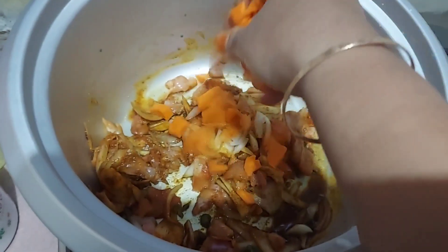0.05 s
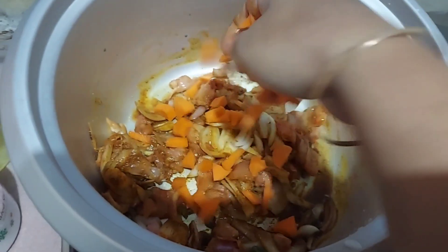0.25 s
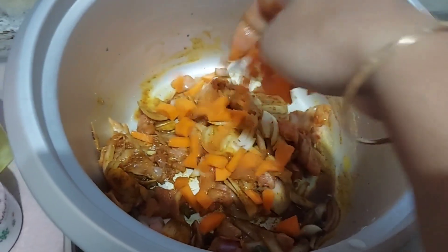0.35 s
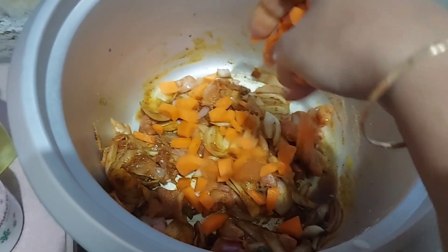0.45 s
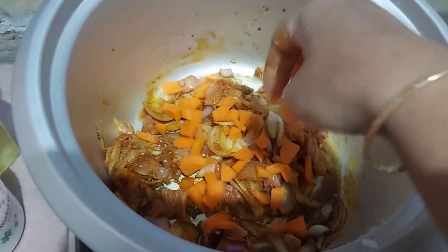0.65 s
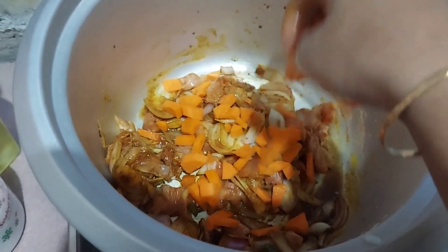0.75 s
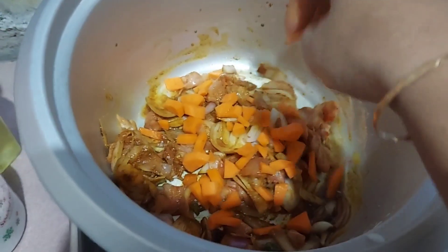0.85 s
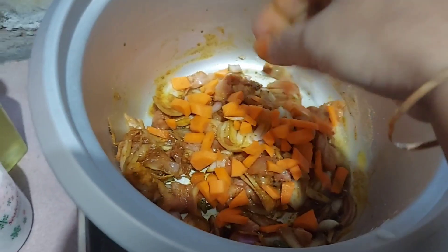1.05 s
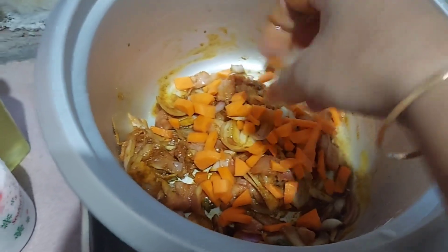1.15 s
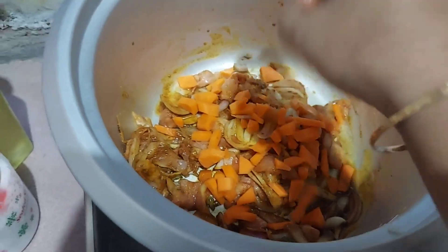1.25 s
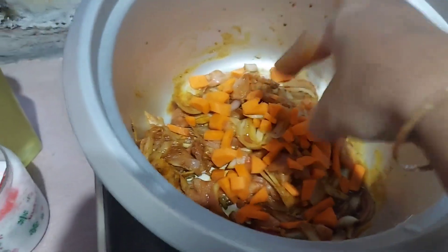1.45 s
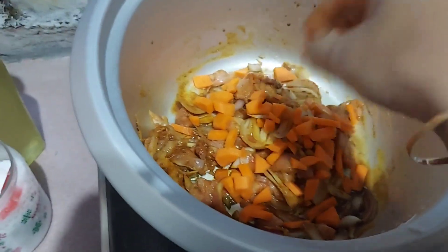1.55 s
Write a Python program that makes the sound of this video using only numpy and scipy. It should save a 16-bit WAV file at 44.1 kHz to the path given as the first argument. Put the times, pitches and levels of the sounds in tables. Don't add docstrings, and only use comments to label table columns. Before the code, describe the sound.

Chopped carrot pieces drop in soft hollow thuds into a deep metal pot, then a bangle clinks

```python
import sys
import numpy as np
from scipy import signal
from scipy.fft import rfft, irfft, next_fast_len
from scipy.io import wavfile

SR = 44100
rng = np.random.default_rng(int(sys.argv[2]) if len(sys.argv) > 2 else 0)


def wav_record(signal):
    frames = np.transpose(np.atleast_2d(signal))
    bounded = np.clip(frames, -1, 1)
    quanta = np.round(bounded * 32767).astype(np.int16)
    wavfile.write(sys.argv[1], SR, quanta)


def volts_from_decibels(level):
    exponent = np.asarray(level, float) / 20
    return 10 ** exponent


N = 70560
TIME_S = np.arange(N) / SR
OPPOSITE = np.array([[.5], [-.5]])


def rms_one(x):
    return x / np.sqrt(np.mean(x ** 2) + 1e-20)


def at_hz(points, hz):
    table_hz, values = np.transpose(points)
    return np.interp(np.log(hz), np.log(table_hz), values)


def ring(clicks, hz, t60):
    r, w = volts_from_decibels(-60 / (t60 * SR)), 2 * np.pi * hz / SR
    return signal.lfilter([0, np.sin(w)], [1, -2 * r * np.cos(w), r * r], clicks + 1e-18)


def resonance(x, hz, width_hz):
    r = np.exp(-np.pi * width_hz / SR)
    return signal.lfilter([1, 0, -1], [1, -2 * r * np.cos(2 * np.pi * hz / SR), r * r], x)


def steep_resonance(x, hz, width_hz):
    return resonance(resonance(x, hz, width_hz), hz, width_hz)


def high_pass(x, hz):
    return signal.sosfilt(signal.butter(4, hz, "high", fs=SR, output="sos"), x)


def coloured(x, spectrum):
    hz = np.fft.rfftfreq(N, 1 / SR) + 1
    return irfft(rfft(x) * volts_from_decibels(at_hz(spectrum, hz)), N)


def burst(s, ms):
    u = np.maximum(TIME_S - s, 0) * 1000 / ms
    return 2 * (1 - np.exp(-6 * u)) * np.exp(-np.minimum(u, 50))


# (frequency [Hz], width [Hz], level [dB])
FAN_TONES = [
    (84.6, 5.2, -78.5),
    (159.2, 21, -63.5),
    (325.5, 3.7, -70),
]
# (frequency [Hz], level [dB])
AIR_COLOUR = [(20, -11), (45, -9), (100, 1), (200, -4), (416, -15), (1040, -34.5), (2840, -31),
              (16000, -42.5)]
# (frequency [Hz], likeness [0 to 1])
AIR_LIKENESS = [(30, 0.1), (80, 0.98), (200, 0.8), (700, 0.93), (2500, 0.15), (12000, 0.032)]
AIR_DB = -60


def kitchen_air():
    hum = 0
    for hz, width_hz, db in FAN_TONES:
        narrow = steep_resonance(rng.standard_normal(N + SR), hz, width_hz)[SR:]
        hum = hum + volts_from_decibels(db) * rms_one(narrow)
    alike = np.clip(at_hz(AIR_LIKENESS, np.fft.rfftfreq(N, 1 / SR) + 1), 0, 1)
    mid, side = rfft(coloured(rng.standard_normal((2, N)), AIR_COLOUR))
    air = irfft(np.sqrt(1 + alike) * mid + np.sqrt(1 - alike) * side * np.array([[1], [-1]]), N)
    return hum + volts_from_decibels(AIR_DB) * rms_one(air)


FAN_TONE_HZ, FAN_TONE_DB = 160.5, -56


def blade_tone():
    return volts_from_decibels(FAN_TONE_DB) * np.sqrt(2) * np.sin(2 * np.pi * FAN_TONE_HZ * TIME_S)


# (time [s], level [dB])
RUSTLE_LEVEL = [(0, -75.5), (.12, -83.5), (0.221, -69.5), (.35, -70.5), (.5, -72.5), (.64, -70.5),
                (0.699, -83), (0.949, -91), (0.997, -70.5), (1.098, -99.5), (1.3, -104), (1.5, -83.5)]
# (frequency [Hz], level [dB per Hz])
GRAIN_COLOUR = [(250, -32), (480, -3.5), (1040, -12.5), (1500, -26), (3000, -26), (6000, -31), (10000, -36),
                (15000, -32)]
GRAINS_PER_S, RUSTLE_DB, GRAIN_SPREAD_DB = 6100, 3.5, 3.8


def rustle():
    size_db = GRAIN_SPREAD_DB * np.minimum(rng.exponential(1, (2, N)), 5)
    sizes = volts_from_decibels(size_db) * rng.choice([-1, 1], (2, N))
    grains = sizes * (rng.random((2, N)) < GRAINS_PER_S / SR)
    sound = coloured(grains, GRAIN_COLOUR)
    treble = high_pass(sound, 2000)
    s, db = np.transpose(RUSTLE_LEVEL)
    return volts_from_decibels(np.interp(TIME_S, s, db) + RUSTLE_DB) * sound / np.std(treble)


# (time [s], peak level [dB], brightness [dB per octave], reach into the wall [dB])
LANDINGS = [(.002, -70.5, 24, -2), (0.0401, -32, -9, -2), (.059, -37.5, -1.5, 2), (.069, -35.5, -6, -14),
            (.108, -49.5, -2, -6), (.168, -51.5, -1, 0), (0.195, -43, -15, -13), (.229, -12.5, 2, 1.5),
            (.245, -36, 0.5, 1), (.253, -35.5, -1.5, 4), (.263, -32.5, 0.5, 0), (.277, -31.5, 1, -7.5),
            (.289, -37, 0, 16), (.312, -44, -2.5, 0), (.327, -43.5, 4.5, 5), (.35, -38.5, -2, -5.5),
            (.388, -34.5, 0.5, 1.5), (0.417, -42.5, -1.5, 3), (.445, -35.5, -8, 4), (0.48, -42.5, -3.5, -2),
            (0.508, -38, 2.5, 2.5), (0.529, -63, -2, 1), (.546, -42.5, 8.5, 1), (0.589, -41.5, -15, -2),
            (.631, -36.5, -2, -10), (.672, -55.5, -3, 7), (.763, -29.5, 3.5, -4), (.779, -28, 4, -8.5),
            (.796, -48, -1, -9), (0.855, -47.5, 4, 0.5), (0.943, -47, -8, -7), (.973, -39.5, -2, -4),
            (.99, -40.5, -1, -6), (1.049, -51.5, -1, -7.5), (1.077, -57, 11.5, -5), (1.149, -23.5, -3, 0),
            (1.157, -33, -10, -14), (1.166, -30.5, 1, -3), (1.176, -33.5, -5, -1), (1.184, -37.5, 3, -8),
            (1.197, -55, -8, 6), (1.219, -55, -14, 0), (1.262, -27.5, 0.5, 0.5), (1.282, -40, 3, -3.5),
            (1.296, -42.5, -1.5, 0), (1.335, -33.5, 0, -1), (1.409, -44.5, 0, 7)]
# (level [dB], t60 [s])
POT_MODES = [(-11, 0.038), (0, 0.072), (0.5, 0.069), (-8.5, 0.2), (-8, 0.19), (-7.5, 0.052), (-6.5, 0.014),
             (-11.5, 0.04), (-1, 0.056), (-6, 0.037), (-9.5, 0.01), (-27, 0.066), (-19, 0.04),
             (-22.5, 0.035)]
POT_PITCHES = [325, 408, 452, 486, 548, 686, 740, 815, 1037, 1095, 1180, 1390, 1525, 1720]
THUD_DB, POT_LOW_HZ, WALL_FROM_HZ, WALL_REACH_HZ = -9, 334.5, 720, 950
CONTACT_MS, LONGEST_CONTACT_MS, SOFTER_PER_DB = 0.7, 1.23, 0.3057
FIRST_TOUCH_DB, FULL_WEIGHT_MS = -13.5, 1.356
SETTLE_DB, SETTLE_MS, SETTLE_PER_S = -21, 40.9, 900
DETUNE, STRENGTH_SPREAD_DB, MODE_PAN_DB = .008, 2.0, 5


def landing_push(tilt, ms):
    contact_ms = min(CONTACT_MS * np.exp(-SOFTER_PER_DB * tilt), LONGEST_CONTACT_MS)
    pulse = 0
    for late_ms, db in [(0, FIRST_TOUCH_DB), (FULL_WEIGHT_MS, 0)]:
        press = np.sin(np.pi * np.clip((ms - late_ms) / contact_ms, 0, 1)) ** 2
        pulse = pulse + volts_from_decibels(db) * press / (contact_ms * SR / 2000)
    touches = rng.standard_normal(len(ms)) * np.exp(-ms / SETTLE_MS)
    touches *= rng.random(len(ms)) < SETTLE_PER_S / SR
    return pulse + volts_from_decibels(SETTLE_DB) * np.convolve(touches, pulse[:200])[:len(ms)]


def thuds():
    ms = np.arange(9000) * 1000 / SR
    out = np.zeros((2, N + len(ms)))
    for s, peak_db, tilt, wall_db in LANDINGS:
        push = landing_push(tilt, ms)
        start = int(s * SR)
        for hz, (mode_db, t60) in zip(POT_PITCHES, POT_MODES):
            strength, pitch, pan = rng.standard_normal(3)
            db = peak_db + mode_db + THUD_DB + tilt * np.log2(hz / 500)
            db += wall_db * (hz > WALL_REACH_HZ) + STRENGTH_SPREAD_DB * strength
            sound = np.sign(hz - WALL_FROM_HZ) * volts_from_decibels(db) * ring(push, hz * (1 + DETUNE * pitch), t60)
            out[:, start:start + len(ms)] += volts_from_decibels(MODE_PAN_DB * pan * OPPOSITE) * sound
    return high_pass(out[:, :N], POT_LOW_HZ)


# (time [s], level at 2.9 kHz [dB], level at 6.4 kHz [dB], level at 14.6 kHz [dB])
TICKS = [(0.042, -49.5, -57, -69), (0.0676, -58, -68, -58.5), (0.169, -53, -63, -62),
         (0.2004, -51.5, -70, -63), (0.2174, -62, -86, -79), (0.2294, -35, -49.5, -60),
         (0.2456, -68, -66, -53), (0.2859, -50, -64, -52), (0.3163, -56, -61.5, -61),
         (0.3645, -81, -78, -55), (0.3877, -47.5, -58.5, -52), (0.418, -70, -67, -75),
         (0.4565, -60, -69, -57), (0.4754, -79, -81, -62), (0.503, -58, -57.5, -44.5),
         (0.5313, -37.5, -63, -60), (0.558, -59, -63, -66), (0.582, -57, -64, -59),
         (0.633, -55, -77, -69), (0.7629, -44.5, -73, -86), (0.7947, -51, -70, -83),
         (0.851, -51.5, -74, -69), (0.9236, -60, -88, -83), (0.945, -54.5, -83, -86),
         (0.9724, -46.5, -59, -75), (0.9824, -65, -59.5, -48.5), (1.0273, -79, -85, -61.5),
         (1.076, -50.5, -65.5, -74), (1.0953, -83.5, -72, -58), (1.1224, -56, -88, -68),
         (1.1516, -41.5, -54.5, -54),
    (1.173, -58, -87.5, -63.5),
    (1.1888, -68, -68, -65),
    (1.2194, -85, -83, -61.5),
    (1.264, -43, -57.5, -83),
    (1.2814, -54.5, -72, -69),
    (1.337, -52.5, -67, -99),
    (1.3475, -43.5, -71.5, -91),
    (1.4696, -62.5, -67, -63),
]
# (frequency [Hz], width [Hz], burst [ms], level [dB])
TICK_RESONANCES = [
    (2910, 2500, 2.07, -9.5),
    (6430, 2970, 1.57, 2),
    (14600, 6300, 1.34, -3.5),
]
TICK_OWN, JUICE_DB, JUICE_MS = 1, -16, 17


def ticks():
    out = 0
    for band, (hz, width_hz, ms, db) in enumerate(TICK_RESONANCES):
        envelope = 0
        for tick in TICKS:
            shape = burst(tick[0], ms) + volts_from_decibels(JUICE_DB) * burst(tick[0], JUICE_MS)
            envelope = envelope + volts_from_decibels(tick[band + 1]) * shape
        noise = rng.standard_normal(N) + TICK_OWN * rng.standard_normal((2, N))
        bursts = steep_resonance(envelope * noise, hz, width_hz)
        steady = steep_resonance(noise, hz, width_hz)
        out = out + volts_from_decibels(db) * bursts / np.std(steady)
    return out


# (time [s], peak level [dB], frequency [Hz],
# t60 [s])
SHORT_KNOCKS = [(0.043, -61, 1670, 0.042), (0.0429, -35.5, 433.5, 0.091), (0.168, -51, 1010, 0.043),
                (1.151, -29.5, 407, 0.096), (0.765, -40, 450, .07), (0.2162, -50, 2920, 0.028),
                (0.418, -54.5, 2940, .03), (.509, -61, 2070, 0.24), (.2295, -39, 2236, .04),
                (0.531, -42.5, 1780, 0.016), (.9248, -53, 2920, .02), (.945, -47, 3076, 0.017),
                (.974, -46, 3575, 0.027), (1.076, -55, 1930, 0.034), (1.126, -52.5, 2750, 0.039),
                (1.152, -50.5, 2150, 0.038), (1.153, -53.5, 1613, 0.051), (1.264, -56.5, 2160, 0.092),
                (1.347, -45, 2790, 0.02), (1.538, -40.5, 3720, 0.013)]


def knocks():
    out = np.zeros(N)
    for s, db, hz, t60 in SHORT_KNOCKS:
        click = np.zeros(N)
        click[int(s * SR)] = volts_from_decibels(db)
        out += ring(click, hz, t60) - 0.42 * ring(click, hz, 1.05 * t60)
    return out


BUMP_S, BUMP_DB, BUMP_HZ, BUMP_WIDTH_HZ, BUMP_MS = 0.915, -62, 52, 49, 60


def bump():
    noise = steep_resonance(rng.standard_normal((2, N)), BUMP_HZ, BUMP_WIDTH_HZ)
    return volts_from_decibels(BUMP_DB) * burst(BUMP_S, BUMP_MS) * rms_one(noise)


# (level [dB], t60 [s])
BANGLE_MODES = [(6.5, 0.13), (-3, 0.12), (5.5, 0.067), (-2, 0.097), (11.5, 0.023), (-18.5, 0.13),
                (0.5, 0.22), (-8, .12), (-2, .04), (-1, .04), (11, 0.027), (-6, 0.13), (-8, 0.16),
                (-20, 0.14)]
BANGLE_PITCHES = [4745, 4880, 5012, 5227, 5480, 6363, 6602, 6856, 7010, 7260, 7600, 8193, 8796, 9749]
BANGLE_S, BANGLE_DB, BANGLE_PAN_DB, BLOOM_S = 1.5216, -46, 4.5, 0.0002
HAZE_DB, HAZE_T60_S, HAZE_CENTRE_HZ, HAZE_GAP_HZ = -61.5, 0.49, 6870, 6050
UNDER_HAZE_DB = -9
SNAP_DB, SNAP_HZ, SNAP_T60_S = -24, 6890, 0.0084


def bangle():
    click = np.zeros(N)
    click[int(BANGLE_S * SR)] = 1
    out = np.zeros((2, N))
    for k, (hz, (db, t60)) in enumerate(zip(BANGLE_PITCHES, BANGLE_MODES)):
        pan_db = BANGLE_PAN_DB * rng.standard_normal() * OPPOSITE
        out += (-1) ** k * volts_from_decibels(BANGLE_DB + db + pan_db) * ring(click, hz, t60)
    for spot, luck, sign, pan in rng.random((200, 4)):
        hz = 2700 * 5.8 ** spot
        db = HAZE_DB - 14 * luck - 3.8 * abs(np.log2(hz / HAZE_CENTRE_HZ))
        db -= 15 * np.exp(-((hz - HAZE_GAP_HZ) / 300) ** 2)
        db += UNDER_HAZE_DB * (hz < BANGLE_PITCHES[0])
        gain = np.sign(sign - .5) * volts_from_decibels(db + 20 * (pan - 1.0) * OPPOSITE)
        out += gain * ring(click, hz, HAZE_T60_S * 5000 / hz)
    snap = ring(click, SNAP_HZ, SNAP_T60_S) - 0.2 * ring(click, 1.28 * SNAP_HZ, SNAP_T60_S)
    bloom = 1 - np.exp(-np.maximum(TIME_S - BANGLE_S, 0) / BLOOM_S)
    return (out + volts_from_decibels(SNAP_DB) * snap) * bloom


# (level [dB], swell [ms])
WALL_SWELLS = [
    (-21, 25),
    (-15.5, 24),
    (-11.5, 36),
    (-8, 53),
    (-20, 15),
    (-9.5, 10),
    (-14, 19),
]
WALL_PITCHES = [1000, 1497, 2293, 2449, 2600, 4609, 5771]
WALL_T60_S, WALL_ROUGH, WAVER_WIDTH_HZ = 1.4, .45, 90


def wall():
    after_s = np.maximum(TIME_S - BANGLE_S, 0)
    out = 0
    for hz, (db, swell_ms) in zip(WALL_PITCHES, WALL_SWELLS):
        waver = rms_one(resonance(rng.standard_normal((2, N)), hz, WAVER_WIDTH_HZ))
        turns = hz * after_s + .15 * rng.standard_normal((2, 1))
        tone = np.sqrt(.5) * WALL_ROUGH * waver + np.sin(2 * np.pi * turns)
        swell = 1 - np.exp(-after_s * 1000 / swell_ms)
        out = out + volts_from_decibels(BANGLE_DB + db - 60 * after_s / WALL_T60_S) * swell * tone
    return out


# (frequency [Hz], t60 [s])
ROOM_DECAY = [(200, 0.31), (800, 0.22), (3000, 0.25), (12000, 0.036)]
ROOM_SHARED_HZ = 450


def room(x):
    size = next_fast_len(N + SR)
    hz = np.fft.rfftfreq(size, 1 / SR) + 1e-3
    out = np.zeros((2, len(hz)), complex)
    for k, lag_s in enumerate(rng.uniform(.003, .03, 20)):
        loop = volts_from_decibels(-60 * lag_s / at_hz(ROOM_DECAY, hz)) * np.exp(-2j * np.pi * hz * lag_s)
        out[k % 2] += (-1) ** (k // 2) * loop / (1 - loop)
    for lag_s in rng.uniform(.001, .005, (3, 2, 1)):
        turn = np.exp(-2j * np.pi * hz * lag_s)
        out = out * (turn - .6) / (1 - .6 * turn)
    shared = .5 / (1 + (hz / ROOM_SHARED_HZ) ** 4)
    out = (1 - shared) * out + shared * out[::-1]
    return irfft(out * rfft(x, size), size)[:, :N]


THUD_ROOM_DB, TICK_ROOM_DB, CLINK_ROOM_DB = -17, -21, -14.5


def scene():
    thud, tick, clink = thuds(), ticks() + knocks(), bangle()
    send = volts_from_decibels(THUD_ROOM_DB) * thud.mean(axis=0)
    send = send + volts_from_decibels(TICK_ROOM_DB) * tick[0] + volts_from_decibels(CLINK_ROOM_DB) * clink[0]
    pot = thud + tick + clink + room(send)
    return pot + rustle() + kitchen_air() + blade_tone() + bump() + wall()


def top_cut(x):
    return signal.sosfilt(signal.butter(12, 16460, fs=SR, output="sos"), x)


# (frequency [Hz], level [dB])
PORT_BALANCE = [(40, -2), (70, -9), (300, 4.5), (600, -1.5), (1100, 2.5), (2500, 9.5), (5000, 8.5),
                (8000, 5), (14000, 11.5)]
LEFT_LAG_MS, TOP_CUT_HZ = -0.1, 16550


def record(dry):
    hz = np.fft.rfftfreq(N, 1 / SR) + 1
    balance = volts_from_decibels(at_hz(PORT_BALANCE, hz))
    left = balance * np.exp(-2j * np.pi * hz * LEFT_LAG_MS / 1000)
    gains = np.array([left, np.ones_like(left)]) * 2 / (1 + balance)
    heard = irfft(rfft(dry) * gains, N)
    mix = signal.sosfilt(signal.cheby2(14, 70, TOP_CUT_HZ, fs=SR, output="sos"), heard)
    return top_cut(mix)


dry = scene()
out = record(dry)
wav_record(out)
```